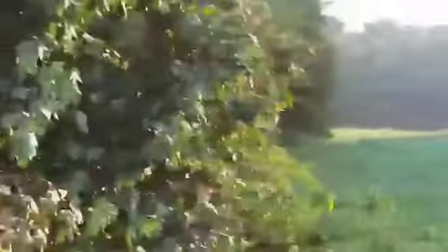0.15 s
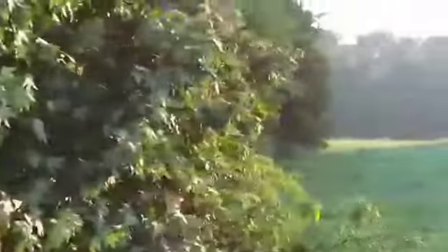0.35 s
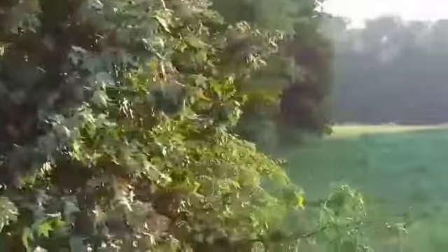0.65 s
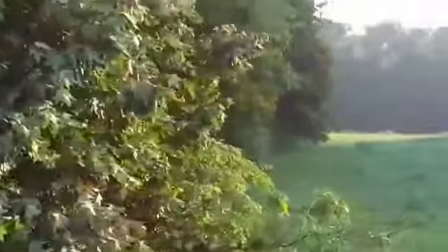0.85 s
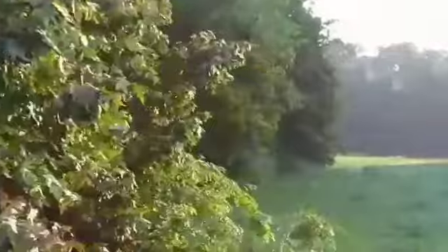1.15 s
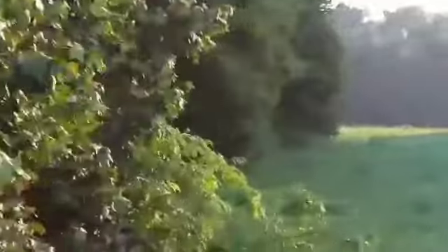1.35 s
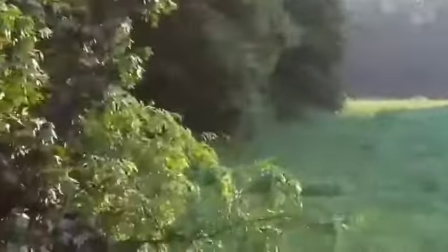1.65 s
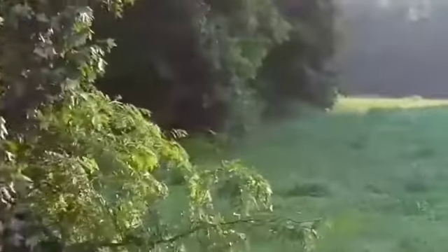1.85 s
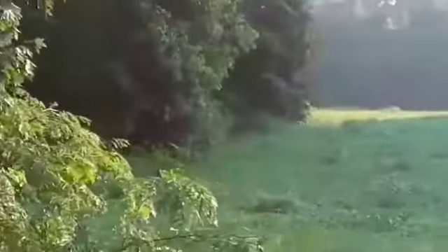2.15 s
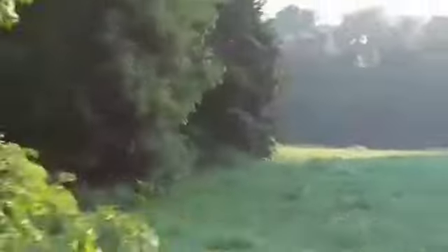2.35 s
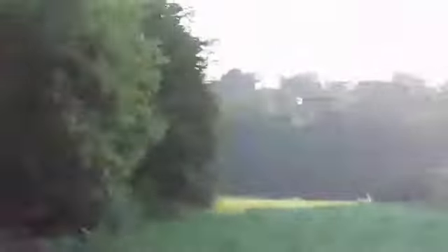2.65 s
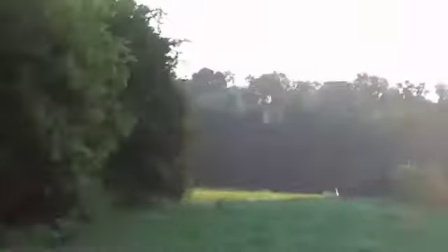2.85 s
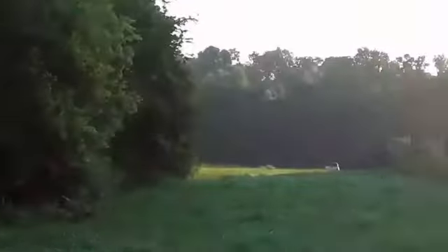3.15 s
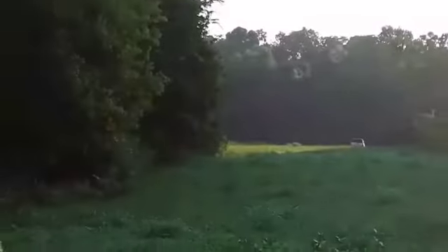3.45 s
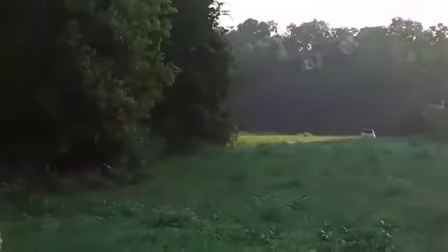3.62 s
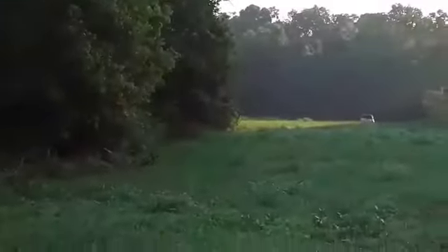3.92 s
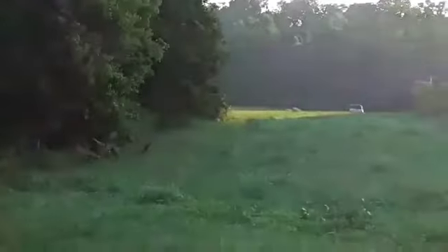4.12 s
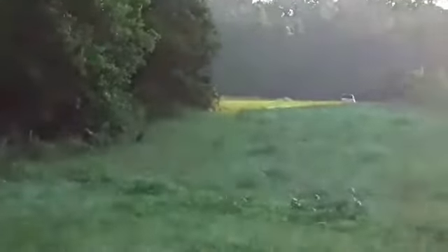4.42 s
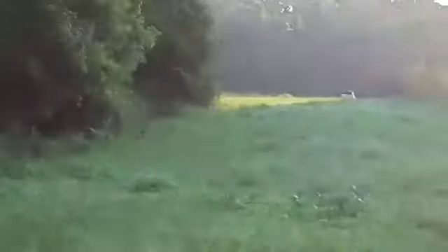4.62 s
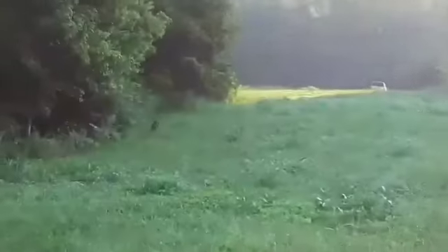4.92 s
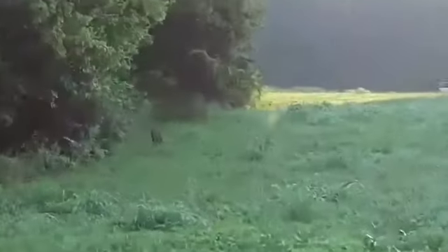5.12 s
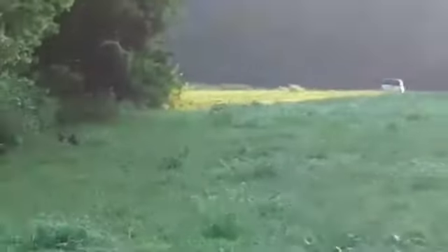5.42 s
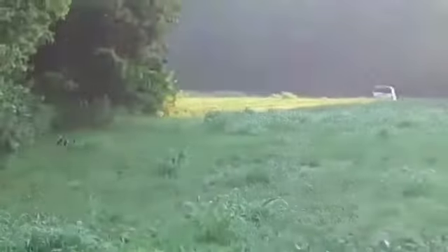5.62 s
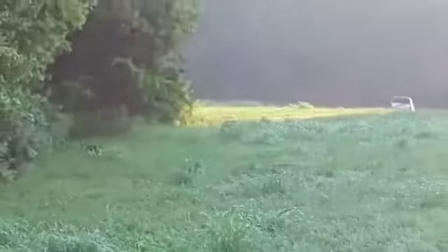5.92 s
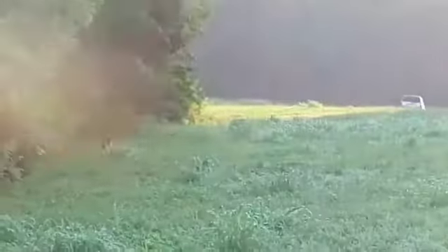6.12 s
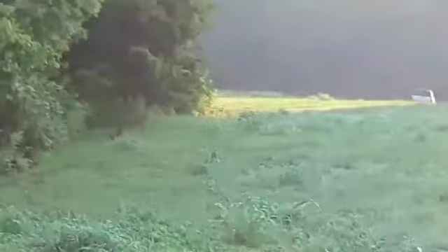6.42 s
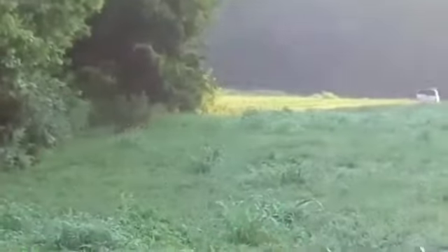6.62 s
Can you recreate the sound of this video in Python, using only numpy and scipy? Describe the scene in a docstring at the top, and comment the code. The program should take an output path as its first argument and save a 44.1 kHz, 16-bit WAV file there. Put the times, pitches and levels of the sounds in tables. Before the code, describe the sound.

Two hounds bay and howl in overlapping calls near trees, while someone wades through leaves and snapping twigs and insects buzz.

```python
"""Hounds baying beside a wood

Two hounds bay in turn, their calls overlapping and echoing among the trees. In each bay the vocal
folds scoop up in pitch, break into a rasp as the jaws open, then settle into a long howl.
Close by, someone wades through leaves and twigs. Katydids scrape their wings, and crickets
and a small bird sound from the field."""
import sys
import numpy as np
from scipy import signal
from scipy.fft import rfft, irfft, next_fast_len
from scipy.io import wavfile
from scipy.ndimage import map_coordinates

SR = 44100
rng = np.random.default_rng(int(sys.argv[2]) if len(sys.argv) > 2 else 0)


def transcribe(u):
    """Save the signal u as a 16-bit wav file named by the first command-line argument.

    u: samples, shape (n,) or (channels, n), limited to [-1, 1]; the rate is SR.
    q: integer samples, one column per channel.
    """
    v = np.clip(np.atleast_2d(u).T, -1, 1)
    q = np.round(v * 32767).astype(np.int16)
    wavfile.write(sys.argv[1], SR, q)


N = 298557
TIME = np.arange(N) / SR

# Levels are relative within a table; a source may add its own trim.
# spectrum of still air: frequency_hz, gain_db
AIR_SPECTRUM = [(100,-17),(300,-2.5),(700,6),(1200,-4.5),(1800,0),(2600,-5),(4000,-18),(7000,-11),(10000,-25),(13000,-17.5),(15500,-22)]
# handling noise and distant rumble: time_s, level_db
RUMBLE_LEVELS = [(0, -64.5), (.5, -62.5), (1.0, -61.5), (1.3, -57), (1.9, -64), (2.65, -61.5), (3.4, -63.5),
                 (4.35, -65), (4.66, -56), (4.83, -74), (5.12, -58), (5.5, -55.5), (5.9, -63.5),
                 (6.77, -61)]
# spectrum of the rumble: frequency_hz, gain_db
RUMBLE_SPECTRUM = [(20,-22),(40,-13),(70,-4.5),(115,3.5),(170,-2),(250,-8),(500,-19.5),(900,-59)]
# steady rustle, which dies away while the walker stands: time_s, level_db
RUSTLE_LEVELS = [(0, -61), (3.9, -57), (4.3, -78), (5.0, -90), (6.0, -71), (6.77, -58)]
# leafy branches sweeping past: peak_s, rise_s, fall_s, level_db
BRANCH_SWEEPS = [(.28, 0.13, 0.26, -50), (.51, .05, 0.071, -50.5), (.91, 0.18, 0.17, -48.5),
                 (1.15, 0.079, 0.029, -45.5), (1.417, 0.03, 0.12, -43.5), (1.55, 0.23, 0.15, -45),
                 (1.69, 0.067, 0.1, -49), (1.89, 0.13, .2, -49.5), (2.05, 0.23, 0.19, -44),
                 (2.22, 0.11, 0.15, -51), (2.472, .025, 0.055, -46), (2.56, 0.082, 0.24, -43),
                 (3.14, .2, .2, -44.5), (3.49, 0.079, 0.17, -48), (3.58, .12, 0.38, -49.5),
                 (4.125, 0.29, 0.1, -50), (4.54, 0.026, 0.042, -56), (5.39, 0.4, 0.22, -62),
                 (6.17, 0.3, 0.27, -53.5)]
# spectrum of rubbing leaves: frequency_hz, gain_db
LEAF_SPECTRUM = [(150,-19),(300,7.5),(900,12.5),(2500,5),(4000,-4.5),(7000,-4),(10000,-9.5),(12500,-1.5),(15500,-4)]
# cricket chorus: time_s, level_db
CRICKET_LEVELS = [(0.1, -64), (0.52, -63.5), (1.39, -61), (2.4, -63), (4.22, -60.5), (4.95, -60),
                  (6.65, -56.5)]
# evenly paced katydid buzzes: first_s, last_s, approximate_period_s, level_db, pitch_hz
KATYDID_RUNS = [(0.047, 1.097, .175, -60, 8760), (0.164, 1.224, .177, -57.5, 8350),
                (1.346, 2.505, .23, -57, 8290), (2.676, 3.398, .178, -54.5, 8250),
                (3.61, 3.999, .195, -60, 8220), (4.166, 5.002, .139, -59, 8170),
                (5.139, 6.387, .207, -53, 8355)]
# the bird's long slurs: start_s, length_s, start_hz, middle_hz, end_hz, level_db
BIRD_SLURS = [(0.061, 0.065, 3510, 4080, 3710, -71), (4.985, 0.14, 4560, 4640, 4430, -71),
              (5.264, 0.14, 4900, 4030, 3760, -62), (6.094, 0.061, 4210, 5130, 5190, -68),
              (6.306, 0.108, 3810, 4890, 5330, -66)]
# each bay's opening scoop and timbre (third harmonics are relative to the second):
# start_s, scoop_length_s, scoop_hz, scoop_db, scoop_third_db, howl_third_db, growl_db
BAYS = [(.18, 0.057, 549, -39.5, -15, -1.5, -57), (.55, 0.026, 555.4, -34.5, -8.5, -8.5, -66),
        (1.146, 0.032, 539, -32, -9, -14, -48), (1.549, 0.051, 581.5, -47, 7, -6.5, -52),
        (1.81, .035, 506.8, -41, 3, -7, -50.5), (2.531, 0.15, 500.8, -44, -11, -19, -47),
        (2.54, 0.027, 533.9, -30, -22, -9, -51), (3.441, 0.041, 568, -29.5, -17, -24, -54),
        (3.797, 0.039, 514.8, -36, -8, -9.5, -44.5), (4.225, 0.048, 543, -43.5, -12, -0.5, -60),
        (4.446, 0.057, 535.4, -36.5, -6, -6, -59), (5.111, 0.089, 488, -36.5, -13, -16, -45.5),
        (5.311, 0.032, 543.5, -27.5, -20, -4.5, -68), (5.664, 0.033, 616, -36, -21, -7, -66),
        (5.921, 0.098, 515.5, -33, -12.5, -10.5, -50.5), (6.2, .07, 497, -46, -4, -7, -50)]
# the howl after each scoop, one list per bay: time_s, pitch_hz, fundamental_db, overtones_db
HOWLS = [
    [(.26, 623.5, -32.5, -43.5), (.3, 701, -34, -66), (.34, 672, -25.5, -51.5), (.41, 595, -40.5, -42),
     (.49, 668.4, -34, -44.5), (.54, 650, -40, -40), (.57, 582, -48, -47)],
    [(.64, 814, -33, -39), (.68, 716.4, -29.5, -50.5), (.72, 662, -28.5, -46.5), (.8, 676, -36.5, -50.5),
     (.85, 636.5, -32, -49), (.92, 739, -36, -42), (.95, 577, -46, -40), (1.0, 552, -62, -40)],
    [(1.23, 714.5, -37.5, -41), (1.31, 657, -40, -46.5), (1.41, 690.6, -32.5, -42), (1.48, 670, -32, -42.5),
     (1.55, 578, -49, -50)],
    [(1.62, 714, -28, -51), (1.71, 692, -36, -41), (1.75, 605, -35, -53.5), (1.84, 639, -31.5, -46),
     (1.9, 607.3, -31, -48), (1.97, 652, -34.5, -40), (2.01, 617, -37, -68)],
    [(1.89, 743, -44, -52), (1.93, 713.5, -40.5, -47), (2.05, 686, -30.5, -64), (2.1, 642.4, -38, -49),
     (2.16, 652, -39.5, -49), (2.22, 628, -33, -41), (2.33, 587.4, -39, -41), (2.36, 556, -49, -65)],
    [(2.66, 690, -35.5, -43), (2.75, 650, -34, -52), (2.83, 582.2, -34, -65), (3.02, 562.4, -43, -67),
     (3.13, 611.5, -36, -41.5), (3.19, 567, -40.5, -58)],
    [(2.6, 784, -34.5, -54), (2.7, 682, -32, -44), (2.75, 622, -33.5, -51), (2.88, 592, -32, -57),
     (2.94, 635.5, -34, -51), (3.02, 610, -44, -48), (3.13, 656, -29, -42.5), (3.23, 578, -37.5, -70)],
    [(3.5, 734, -35.5, -58), (3.55, 699, -36, -53), (3.6, 678, -33.5, -42.5), (3.75, 604, -44.5, -47),
     (3.85, 653, -30, -52), (3.95, 616, -37.5, -51), (4.14, 604, -35.5, -40), (4.2, 590, -47, -48)],
    [(3.88, 583, -57, -45), (3.95, 598, -48, -50.5), (4.02, 581, -32, -61), (4.09, 563, -36, -64),
     (4.21, 491, -55, -41)],
    [(4.3, 554, -39.5, -50.5), (4.34, 555, -35.5, -54), (4.37, 535, -57, -49)],
    [(4.5, 647.7, -48.5, -49), (4.55, 673.2, -38.5, -51), (4.6, 712.3, -29, -59),
     (4.64, 639.5, -36.5, -42.5), (4.67, 568, -38, -48), (4.7, 560, -53, -73)],
    [(5.17, 601, -38.5, -35.5), (5.2, 614.4, -30.5, -36.5), (5.24, 648, -30, -55),
     (5.28, 680, -30.5, -35.5), (5.32, 590.4, -31.5, -48), (5.37, 535, -47, -48), (5.44, 536, -50, -52)],
    [(5.39, 757.3, -55, -56), (5.44, 705, -51, -50), (5.5, 687.6, -37.5, -47.5), (5.58, 693, -45.5, -53),
     (5.62, 730, -34.5, -46), (5.67, 748.6, -32.5, -46.5), (5.72, 710, -70, -54)],
    [(5.73, 595, -51, -50), (5.79, 608, -83, -55)],
    [(6.02, 639, -47.5, -57), (6.05, 732, -36, -48), (6.1, 669, -50, -41.5), (6.15, 676, -33.5, -43.5),
     (6.21, 635, -38, -39.5), (6.32, 625, -48, -33.5), (6.42, 613, -32.5, -40.5), (6.54, 583.5, -36.5, -52),
     (6.61, 549, -48, -50)],
    [(6.29, 594.5, -44.5, -39), (6.35, 660.4, -44, -49), (6.44, 690, -43, -56), (6.5, 651, -47, -40.5),
     (6.56, 635, -57, -60), (6.63, 680, -46, -53), (6.73, 725, -41, -55.5), (6.77, 644, -49, -40)],
]
# voice breaks: start_s, length_s, first_mouth_hz, last_mouth_hz, first_db, last_db, edge_db
RASPS = [(.19, 0.15, 860, 754, -41.5, -34, -51), (.57, 0.13, 1140, 720, -34, -37, -47),
         (0.926, 0.094, 950, 1300, -62, -51, -44.5), (1.179, .1, 1300, 890, -36, -40, -38.5),
         (1.585, 0.13, 820, 870, -39.5, -41, -32), (1.831, 0.12, 800, 950, -38, -36.5, -31),
         (1.98, 0.11, 760, 750, -47, -54, -37.5), (2.575, 0.17, 980, 800, -30, -42, -33),
         (2.73, 0.21, 835, 775, -41.5, -41.5, -48), (3.481, 0.076, 1180, 744, -39, -37.5, -41.5),
         (3.802, .12, 780, 756, -48, -44, -46), (4.225, 0.11, 786, 990, -42, -52, -42.5),
         (4.468, 0.055, 1140, 1240, -34, -43, -42.5), (4.577, 0.084, 780, 790, -34, -42, -48),
         (5.346, 0.14, 1050, 820, -26.5, -37.5, -50), (5.684, 0.041, 1210, 1170, -39, -44, -33.5),
         (5.992, .1, 1130, 1070, -41.5, -44, -51), (6.242, 0.15, 1080, 1090, -35, -51, -56),
         (6.443, 0.2, 760, 870, -37, -57, -44.5)]
# upper throat resonances, the voice's edge: frequency_hz, gain_db
THROAT_EDGE = [(900, -37), (1500, 5.5), (1900, 3), (2450, 5), (2800, -3.5), (3200, -10), (4500, -66)]
# what the throat lets through: frequency_hz, gain_db
THROAT_BAND = [(300, -40.5), (480, -14), (680, 2), (1500, -3), (2700, -6), (3400, 1), (5000, -20)]
# reverberation among the trees: frequency_hz, t60_s
WOOD_DECAY = [(200,1),(700,0.49),(2000,0.66),(5000,0.054)]
# boots on turf: start_s, level_db, pitch_hz
FOOTFALLS = [(.488, -51, 100), (3.129, -40.5, 188), (4.524, -50, 120), (4.585, -40, 130),
             (4.632, -37.5, 110), (4.652, -40, 100), (4.723, -46.5, 98)]
# squeaks, likely of green stems: start_s, length_s, start_hz, middle_hz, end_hz, level_db
STEM_SQUEAKS = [(.5,0.015,2080,1600,1390,-29.5),(3.195,0.029,2990,2680,2300,-46.5),(3.672,.04,1890,1512,1310,-37.5),(3.684,0.041,3040,2510,2100,-44),(5.885,0.024,1820,1760,1720,-43.5)]
# twigs breaking: start_s, level_db
TWIG_CRACKS = [(0.5032, -26.5), (0.5342, -25), (0.5436, -21), (1.1647, -26), (1.446, -38), (1.7736, -25),
               (1.7858, -26), (2.7058, -17), (2.7817, -27.5), (2.7943, -23.5), (2.8758, -31), (3.2047, -34),
               (3.2538, -35), (3.711, -30), (3.723, -22.5), (3.739, -29.5), (4.7297, -38.5)]
# spectrum of a crack: frequency_hz, gain_db
TWIG_SPECTRUM = [(300,-3),(900,2),(1450,7.5),(1900,12.5),(2500,1.5),(3200,2.5),(4500,-51),(14000,-47)]
# single leaves flicking: start_s, level_db
LEAF_TICKS = [(0.8994, -27), (1.1468, -46), (1.4167, -39), (1.4394, -42), (1.5194, -52), (1.913, -29.5),
              (2.074, -42), (2.468, -33), (3.0729, -37), (3.1294, -30), (3.1938, -30), (4.13, -61),
              (4.5336, -54), (4.6788, -53), (4.8344, -49)]
# a thin, very high insect trill: time_s, level_db
TRILL_LEVELS = [(3.6,-100),(3.75,-89),(4.1,-67),(4.2,-87),(4.35,-75),(4.6,-73),(4.7,-100)]

SCOOP_ATTACK_S = .03  # the scoop climbs in pitch and level for this long


def amp(db):
    """Decibels to amplitude ratio."""
    return 10 ** (np.asarray(db) / 20)


def unit(x):
    """Normalisation to rms 1."""
    return x / np.sqrt(np.mean(x ** 2) + 1e-20)


def along(points, hz):
    """Interpolation on a logarithmic frequency axis."""
    frequencies, values = np.transpose(points)
    return np.interp(np.log(hz + 1), np.log(frequencies + 1), values)


def curves(rows, t):
    """Linear interpolation of each column after the first, at times t."""
    times, *columns = np.transpose(rows)
    return [np.interp(t, times, column) for column in columns]


def wobble(rate, n):
    """Smooth random modulation: n samples, rate knots a second."""
    return map_coordinates(rng.standard_normal(int(n * rate / SR) + 4), [np.arange(n) * rate / SR])


def filtered(x, response):
    """Linear filtering: the spectrum is multiplied by a frequency response."""
    size = next_fast_len(len(x) + 8192)
    return irfft(rfft(x, size) * response(np.fft.rfftfreq(size, 1 / SR)), size)[:len(x)]


def coloured(x, spectrum):
    """Spectral shaping, at rms 1."""
    return unit(filtered(x, lambda hz: amp(along(spectrum, hz))))


def resonance(hz, centre, width):
    """A Lorentzian resonance curve."""
    return 1 / (1 + ((hz - centre) / width) ** 2)


def band(centre_hz, width_hz, n):
    """Narrow-band noise of rms 1."""
    return unit(filtered(rng.standard_normal(n), lambda hz: resonance(hz, centre_hz, width_hz)))


def add(track, start_s, x):
    """Superposition of x on the track."""
    i = max(round(start_s * SR), 0)
    track[i:i + len(x)] += x[:max(N - i, 0)]


def span(start, end, fade_s):
    """Sample times and a gate with raised-cosine ends."""
    t = np.arange(start - fade_s, end + fade_s, 1 / SR)
    ramp = np.clip(np.minimum(t - t[0], t[-1] - t) / (2 * fade_s), 0, 1)
    return t, np.sin(np.pi / 2 * ramp) ** 2


def glides(rows, jitter):
    """Frequency modulation: short tones follow a parabola through three pitches."""
    track = np.zeros(N)
    for start, length, *pitches, db in rows:
        progress = np.linspace(0, 1, int(length * SR))
        hz = np.polyval(np.polyfit([0, .5, 1], pitches, 2), progress)
        hz *= 1 + jitter * wobble(380, len(hz))
        add(track, start, amp(db) * np.sin(np.pi * progress) * np.sin(2 * np.pi * np.cumsum(hz) / SR))
    return track


def still_air():
    """Stationary broadband noise forms the ambient floor."""
    return amp(-59) * coloured(rng.standard_normal(N), AIR_SPECTRUM)


def rumble():
    """Handling and distant rumble are low-frequency noise of wavering level."""
    level_db = curves(RUMBLE_LEVELS, TIME)[0] + 1.6 * wobble(12, N)
    return amp(level_db) * coloured(rng.standard_normal(N), RUMBLE_SPECTRUM)


def leaf_rustle(sweep_range_db=15.5, trim_db=3):
    """Friction: leaves hiss in fine grains as each branch sweeps past the walker."""
    sweeps = [db - sweep_range_db * np.maximum((peak - TIME) / rise, (TIME - peak) / fall)
              for peak, rise, fall, db in BRANCH_SWEEPS]
    level_db = np.max(sweeps + curves(RUSTLE_LEVELS, TIME), axis=0)
    grains = amp(2.5 * wobble(500, N) + 1.9 * wobble(40.19, N))
    return amp(level_db + trim_db) * unit(grains * coloured(rng.standard_normal(N), LEAF_SPECTRUM))


def crickets(trim_db=-4):
    """Incoherent summation: many crickets merge into one narrow band of noise."""
    return amp(curves(CRICKET_LEVELS, TIME)[0] + trim_db) * band(5900, 280, N)


def katydids(buzz_s=.11, stroke_hz=(54, 116.64), stroke_depth=.56, trim_db=-1):
    """Stridulation: wing strokes modulate each narrow-band buzz, over a distant chorus."""
    track = amp(-65 + 4.9 * wobble(22, N)) * band(8320, 400, N)
    n = int(buzz_s * SR)
    for first, last, period, db, hz in KATYDID_RUNS:
        for centre in np.linspace(first, last, round((last - first) / period) + 1):
            strokes = rng.uniform(*stroke_hz) * TIME[:n] + rng.random()
            wings = 1 + stroke_depth * np.sin(2 * np.pi * strokes)
            buzz = signal.windows.tukey(n, .5) * wings * band(hz + 35 * rng.standard_normal(), 125, n)
            add(track, centre - buzz_s / 2, amp(db + trim_db + 2.1 * rng.standard_normal()) * buzz)
    return track


def bird(note_s=.062, note_hz=(3400, 4330, 3850), note_db=-65.5, variety=.096):
    """Frequency-modulated whistles: long slurs, and a twitter of one arched note, varied each time."""
    twitter = [(start, note_s, *np.multiply(note_hz, 1 + variety * rng.standard_normal(3)), note_db)
               for start in np.arange(5.47, 6.06, .089)]
    return glides(list(BIRD_SLURS) + twitter, jitter=.015)


def bay_pitch(bay, contour, t, climb_hz_per_s=1600):
    """The fundamental frequency scoops up linearly, then joins the howl's contour."""
    start, _, scoop_hz = bay[:3]
    scoop = [(start, scoop_hz - climb_hz_per_s * SCOOP_ATTACK_S), (start + SCOOP_ATTACK_S, scoop_hz)]
    return curves(scoop + [row[:2] for row in contour], t)[0]


def howl(bay, contour, jitter=.01127, flutter_db=2.33, drift_db=1.87, bite_db=-21.5):
    """Vocal-fold oscillation gives a harmonic series; uneven alternate cycles add half orders."""
    start, scoop_s, _, scoop_db, scoop_third_db, howl_third_db, growl_db = bay
    t, gate = span(start, contour[-1][0], fade_s=.008)
    n, age = len(t), t - start
    pitch = bay_pitch(bay, contour, t) * (1 + jitter * wobble(90.7, n))
    phase = 2 * np.pi * np.cumsum(pitch) / SR
    _, fundamental_db, overtones_db = curves(contour, t)
    # the howl swells up under a scoop made of overtones alone
    swell = amp(-27.5 * np.clip(1 - age / (contour[0][0] - start), 0, 1))
    attack_db = -11 * np.maximum(1 - age / SCOOP_ATTACK_S, 0)
    release_db = -20 * np.maximum(age - scoop_s, 0) / .018
    scoop = amp(scoop_db + attack_db + release_db)
    second = scoop + swell * amp(overtones_db)
    third = scoop * amp(scoop_third_db) + swell * amp(overtones_db + howl_third_db)
    # the top harmonics yelp through the throat's upper resonances and fade as the jaws close
    yelp = third + scoop * amp(bite_db)
    top = [yelp * amp(db + along(THROAT_EDGE, k * pitch) - 12 * age) for k, db in [(4, -8), (5, -13)]]
    hoarseness = np.interp(age, [.03, .1], [.36, .46])
    tone = np.zeros(n)
    for k, gain in enumerate([swell * amp(fundamental_db), second, third] + top, 1):
        flutter = flutter_db * wobble(64.8, n)
        drift = drift_db * np.minimum(wobble(18.24, n), .5)  # paths through the trees fade each harmonic
        phase_blur = (hoarseness * (k - 1) + .3) * wobble(109.75, n)
        tone += gain * amp(np.sqrt(k) * (flutter + drift)) * np.sin(k * phase + phase_blur)
    half_orders = sum(np.sin((k + .5) * phase + wobble(69.35, n)) / k for k in range(1, 4))
    growl = swell * amp(growl_db + 1 - 26.5 * age) * half_orders  # clears as the howl settles
    return np.sqrt(2) * gate * (tone + growl), t[0]


def rasp(row, mouth_width_hz=280, ring_t60_s=.011, breath=.22, edge_fade_db=15):
    """Source and filter: folds slap unevenly at half the pitch; the jaws move the mouth's resonance."""
    start, length, first_hz, last_hz, first_db, last_db, edge_db = row
    t, gate = span(start, start + length, fade_s=.012)
    n = len(t)
    begun = [(bay, contour) for bay, contour in zip(BAYS, HOWLS) if bay[0] < t.mean()]
    bay, contour = max(begun, key=lambda pair: pair[0][0])  # the latest bay
    slap_hz = bay_pitch(bay, contour, t) / 2 * np.exp(.07 * wobble(250, n))
    slaps = np.diff(np.floor(np.cumsum(slap_hz) / SR), prepend=0) * amp(3 * rng.standard_normal(n))
    throat_ring = rng.standard_normal(SR // 50) * amp(-60 * TIME[:SR // 50] / ring_t60_s)
    source = unit(signal.fftconvolve(slaps, throat_ring)[:n]) + breath * rng.standard_normal(n)
    hz, frames, spectra = signal.stft(source, SR, nperseg=512)
    mouth_hz = np.interp(t[0] + frames, [start, start + length], [first_hz, last_hz])
    tract = amp(along(THROAT_BAND, hz))[:, None] * resonance(hz[:, None], mouth_hz, mouth_width_hz)
    voiced = unit(signal.istft(spectra * tract, SR, nperseg=512)[1][:n])
    progress = np.clip((t - start) / length, 0, 1)
    body = amp(first_db + (last_db - first_db) * progress + 2.5) * voiced
    # the edge fades as the jaws close
    edge = amp(edge_db - 1 - edge_fade_db * progress) * coloured(source, THROAT_EDGE)
    onset = np.clip((t - bay[0] - .011) / .038, 0, 1)  # the voice breaks as the scoop climbs
    return gate * onset * (body + edge), t[0]


def hounds(howl_trim_db=.56):
    """Superposition of both dogs' howls and their harsh breaks."""
    track = np.zeros(N)
    for bay, contour in zip(BAYS, HOWLS):
        sound, start = howl(bay, contour)
        add(track, start, amp(howl_trim_db) * sound)
    for row in RASPS:
        sound, start = rasp(row)
        add(track, start, sound)
    return track


def tree_echo(x, near_db=-12, far_db=-16, near_t60_s=.19):
    """Scattering by near trunks and reverberation of the wood; the paths change as the dogs run."""
    track = np.zeros(N)
    hop = SR // 3
    for centre in range(0, N + hop, hop):
        start, end = max(centre - hop, 0), min(centre + hop, N)
        crossfade = 1 - abs(np.arange(start, end) - centre) / hop
        hz, t, spectra = signal.stft(rng.standard_normal(SR), SR, nperseg=256)
        decay = amp(-60 * t / along(WOOD_DECAY, hz)[:, None])
        far = signal.istft(spectra * decay, SR, nperseg=256)[1][:SR]
        near = rng.standard_normal(SR) * amp(-60 * TIME[:SR] / near_t60_s)
        response = (amp(far_db) * unit(far) + amp(near_db) * unit(near)) / np.sqrt(SR)
        add(track, start / SR, signal.fftconvolve(x[start:end] * crossfade, response))
    return track


def footfalls(attack_s=.0014, t60_s=.15, width_hz=42, trim_db=-3):
    """Damped impact: boots on turf give soft, low thuds."""
    track, t = np.zeros(N), TIME[:SR // 4]
    envelope = (1 - np.exp(-t / attack_s)) * amp(-60 * t / t60_s)
    for start, db, hz in FOOTFALLS:
        add(track, start, amp(db + trim_db) * envelope * band(hz, width_hz, len(t)))
    return track


def stem_squeaks():
    """Friction, likely between green stems, gives short, rough, falling tones."""
    return glides(STEM_SQUEAKS, jitter=.044)


def twig_cracks(attack_s=.00039, t60_s=.035, trim_db=-6):
    """Fracture: each twig releases a burst of noise that decays exponentially."""
    track, t = np.zeros(N), TIME[:SR // 10]
    envelope = (1 - np.exp(-t / attack_s)) * amp(-60 * t / t60_s)
    for start, db in TWIG_CRACKS:
        noise = coloured(rng.standard_normal(len(t)), TWIG_SPECTRUM)
        add(track, start, amp(db + trim_db) * envelope * noise)
    return track


def leaf_ticks(t60_s=.017, trim_db=-8):
    """Light impact: dry leaves flick against the walker in brief, bright transients."""
    track, t = np.zeros(N), TIME[:SR // 20]
    for start, db in LEAF_TICKS:
        noise = coloured(rng.standard_normal(len(t)), [(1500, -26), (5000, -7), (9000, 10), (12000, 14)])
        add(track, start, amp(db + trim_db - 60 * t / t60_s) * noise)
    return track


def insect_trill():
    """Amplitude modulation: an insect's thin, high band of noise swells and fades."""
    return amp(curves(TRILL_LEVELS, TIME)[0]) * band(11850, 90, N)


def scene():
    """Superposition of far voices and their echo, the nearby walker, insects and still air."""
    far = hounds() + bird()
    near = leaf_rustle() + twig_cracks() + rumble() + footfalls() + leaf_ticks() + stem_squeaks()
    return (near + insect_trill() + still_air() + far + tree_echo(far) + crickets() + katydids())[None]


def record(dry, cutoff_hz=15600):
    """Band limiting: an ideal low-pass filter removes the highest treble."""
    return filtered(dry[0], lambda hz: hz < cutoff_hz)[None]


dry = scene()
out = record(dry)
transcribe(out)
```